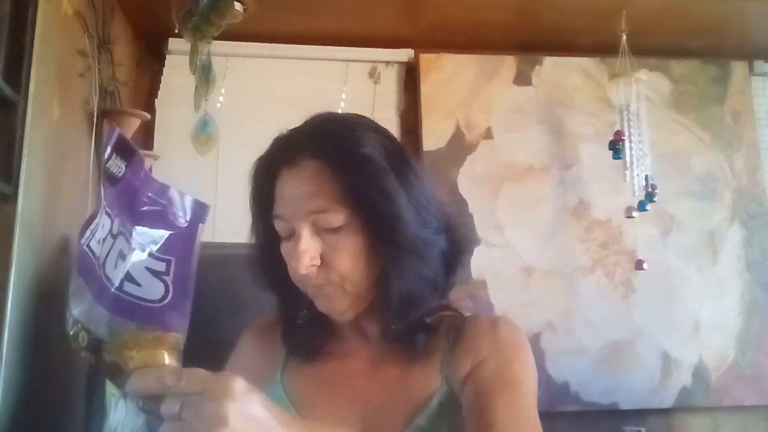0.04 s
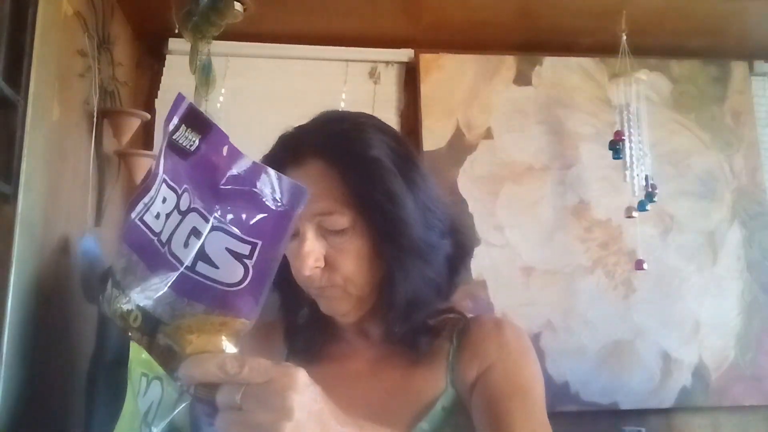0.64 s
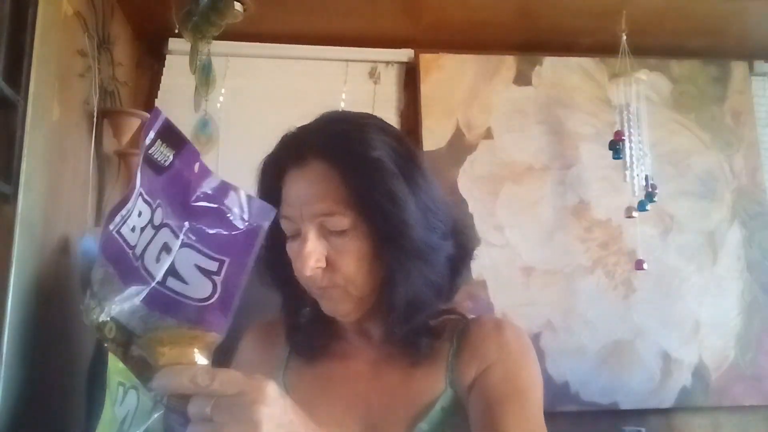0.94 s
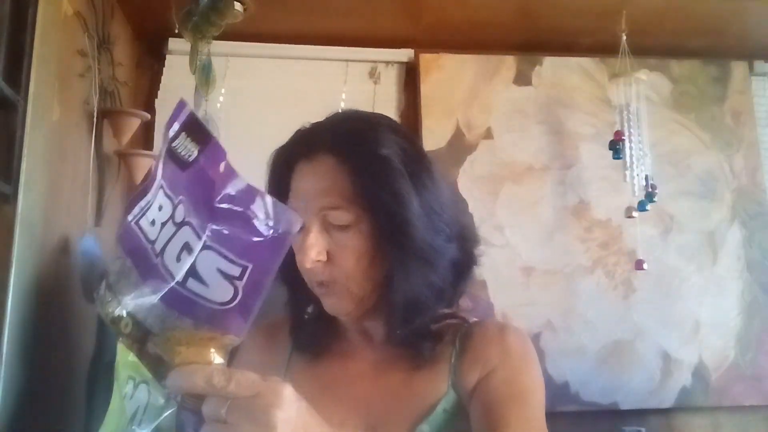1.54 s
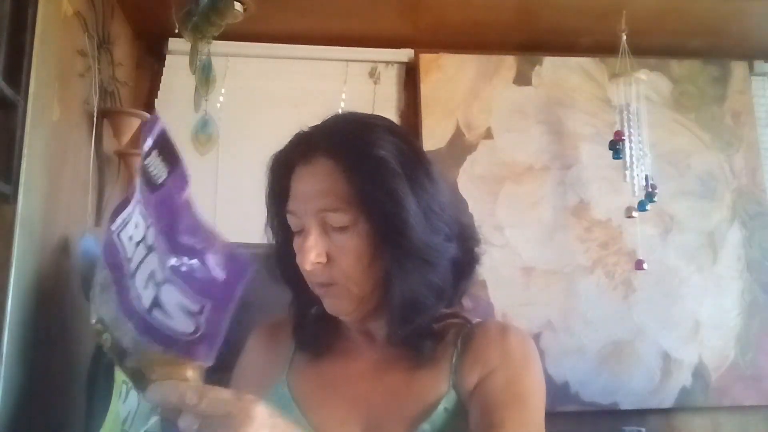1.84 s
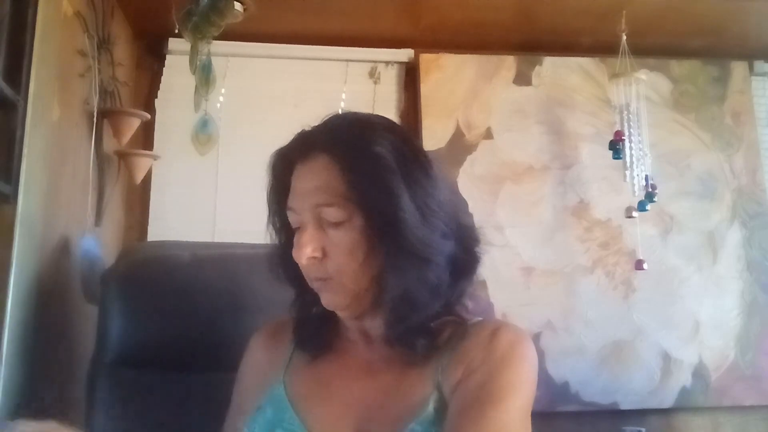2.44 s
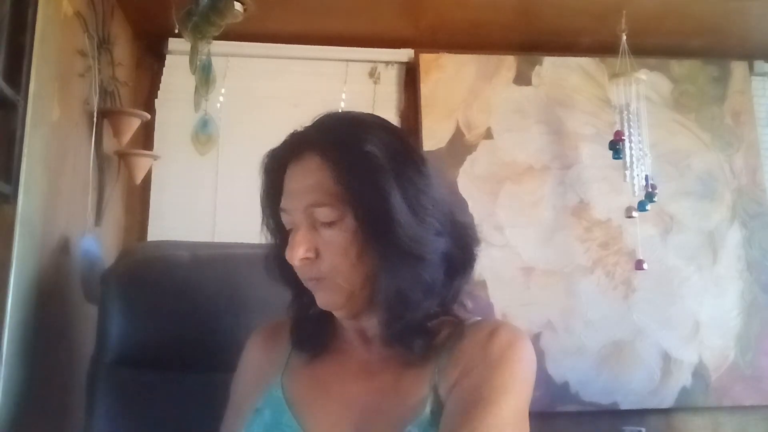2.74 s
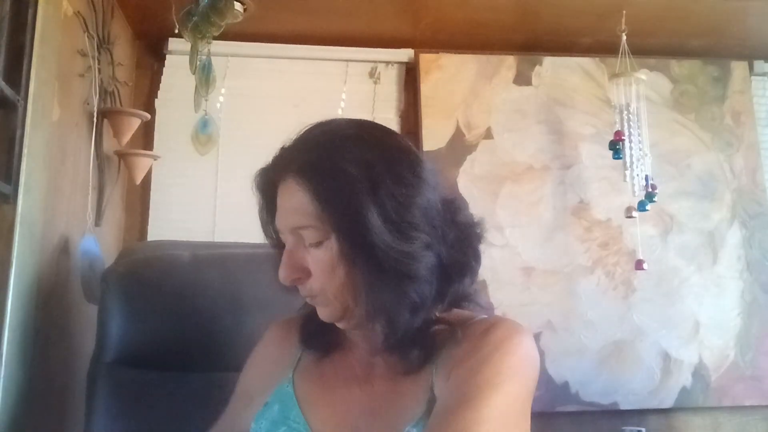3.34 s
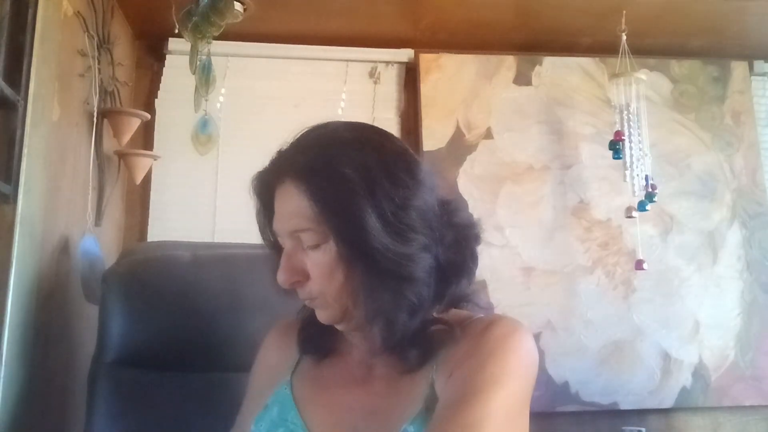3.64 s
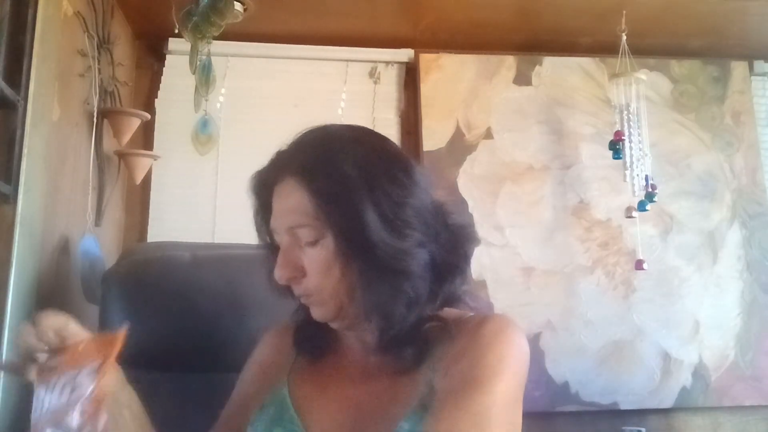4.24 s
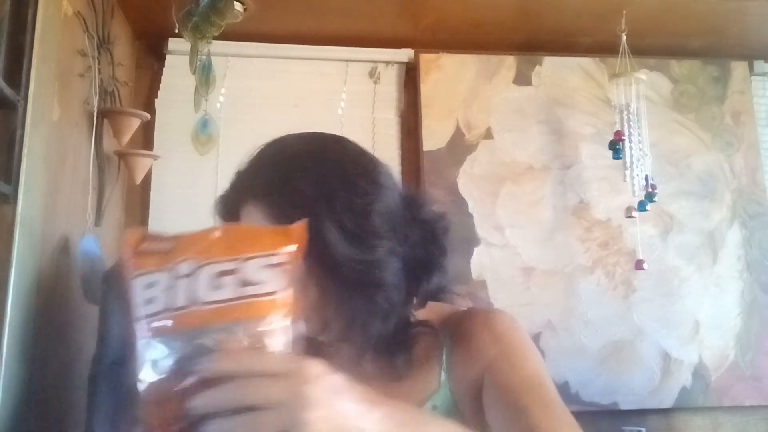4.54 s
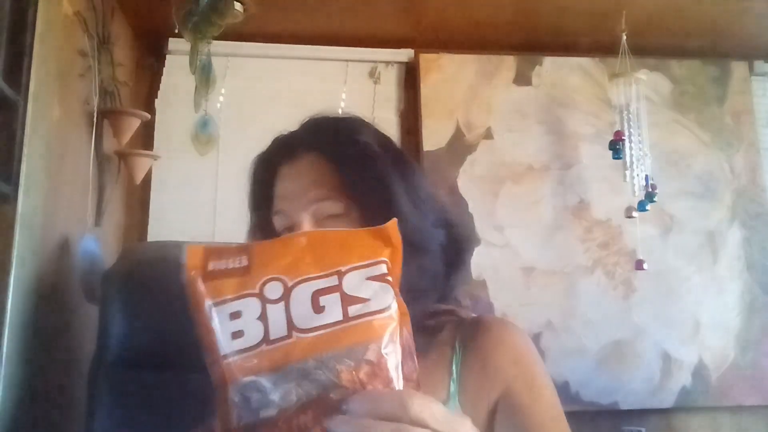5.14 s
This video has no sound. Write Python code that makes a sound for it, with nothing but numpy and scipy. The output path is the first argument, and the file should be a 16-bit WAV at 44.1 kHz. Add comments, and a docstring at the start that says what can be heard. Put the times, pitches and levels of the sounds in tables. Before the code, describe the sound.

Light crinkles and the hiss of fingers rubbing a plastic pouch come from nearby, slightly to the left. About halfway through, the rustling swells into dense crackling and sharp clicks as pouches are shuffled together, with a few soft hollow bumps. The bursts thin out, nearly stop, and return briefly as another pouch is held up. The small room adds short echoes over faint air and a low hum.

```python
"""Plastic snack pouches are handled in a small room, about an arm's length from a two-port microphone.
First a few folds snap; then fingers slide over one pouch, and stick-slip friction makes the film hiss.
Near 2.5 s it is pushed in among others: creases buckle in showers of clicks and the panels flap.
Then another is pulled out and held up, with soft hollow bumps, a lull, and last snaps near 5 s.
Throughout, the walls return short echoes over faint room air and a low hum."""
import sys
import numpy as np
from scipy import signal
from scipy.fft import rfft, irfft
from scipy.io import wavfile
from scipy.ndimage import uniform_filter1d

SR = 44100
rng = np.random.default_rng(int(sys.argv[2]) if len(sys.argv) > 2 else 0)


def generate_wav(sig):
    """Save sig (samples, or channels by samples) to the path in sys.argv[1] as 16-bit PCM at SR."""
    pcm = np.round(np.clip(np.atleast_2d(sig).T, -1, 1) * 32767).astype(np.int16)
    wavfile.write(sys.argv[1], SR, pcm)


N = 229052
TIME = np.arange(N) / SR

# fingers or another pouch slide over the film: (start [s], length [s], first level [dB], last level [dB])
STROKES = [(0.008, 0.025, -48, -52), (0.06, 0.1, -45, -46.5), (0.163, 0.28, -38.5, -48),
           (0.45, 0.24, -50, -57.5), (0.632, 0.047, -48, -50.5), (0.727, 0.02, -54, -60),
           (0.81, 0.12, -68.5, -75), (0.936, 0.049, -55.5, -50.5), (1.01, 0.064, -45.5, -39.5),
           (1.098, 0.1, -43, -36.5), (1.222, 0.15, -47.5, -48), (1.349, 0.067, -46.5, -47),
           (1.432, 0.26, -50, -59.5), (1.705, 0.26, -45, -52), (1.968, 0.15, -52, -49),
           (2.11, 0.13, -49.5, -40), (2.218, 0.096, -39.5, -34.5), (2.324, 0.26, -36.5, -37),
           (2.56, 0.26, -39.5, -35.5), (2.814, 0.044, -34, -35), (2.904, 0.12, -47.5, -39),
           (2.991, 0.14, -44, -43.5), (3.153, 0.16, -50.5, -50), (3.366, 0.19, -40.5, -39.5),
           (3.606, 0.13, -46, -57), (3.778, 0.017, -41, -43), (3.828, 0.02, -26, -37),
           (3.906, 0.29, -45.5, -55), (4.157, 0.16, -45.5, -52), (4.416, 0.27, -66, -74),
           (4.815, 0.14, -64, -63), (4.935, 0.03, -47, -45), (4.995, 0.13, -54, -46)]
# a hand grips, pushes or lifts a pouch: (start [s], length [s], first level [dB], last level [dB],
# small over large creases [dB], flapping over large creases [dB])
SQUEEZES = [(0.041, 0.017, -48.5, -48.5, -1, -12.5), (0.072, 0.023, -39.5, -46.5, 0.5, -11),
            (0.095, 0.019, -39.5, -39, -8, -12), (0.946, 0.026, -71, -59.5, 5.5, -23),
            (2, 0.026, -53.5, -62, -4, -7.5), (2.098, 0.39, -54.5, -48.5, -3.5, -14),
            (2.559, 0.024, -36, -35, 1.5, -15), (2.593, 0.115, -41, -40, 3.5, -11),
            (2.722, 0.11, -36.5, -36.5, 2, -11), (2.868, 0.013, -47, -46.5, 9.5, -13),
            (2.94, 0.026, -44, -45, -3.5, -10), (2.997, 0.021, -41, -37, 1, -12.5),
            (3.053, 0.05, -59, -53.5, 0, -18), (3.364, 0.022, -48, -42.5, 4.5, -13),
            (3.403, 0.019, -37.5, -38.5, 5.5, -13), (3.43, 0.14, -41.5, -40, -2.5, -11),
            (3.647, 0.061, -51.5, -47.5, 0, -14.5), (3.738, 0.05, -46, -48.5, 4.5, -13),
            (3.823, 0.031, -38.5, -40.5, 2, -15), (3.894, 0.04, -58, -47, -4, -19),
            (3.93, 0.12, -42, -45.5, 1, -12), (4.09, 0.071, -46.5, -48, 0, -20),
            (4.158, 0.052, -43.5, -40.5, 4, -14.5), (4.261, 0.051, -42.5, -40.5, -1.5, -15),
            (4.335, 0.11, -49, -63.5, -14, -21), (4.494, 0.2, -64, -78, 2.5, -26),
            (4.806, 0.036, -60, -66, 0.5, -9), (4.876, 0.075, -50, -49.5, -5.5, -15),
            (4.96, 0.15, -43, -43, 2, -12.5)]
# folds that snap through: (time [s], relative level [dB], facet frequency [Hz], edge over facet [dB])
SNAPS = [(0.048, -32.5, 7050, -7), (0.072, -28, 5100, -7), (0.111, -24, 5060, -16),
         (0.124, -30.5, 2500, -11), (0.95, -52, 1390, -1), (1.52, -36.5, 7330, 3), (2.565, -23.5, 3090, -3),
         (2.606, -22.5, 5400, -6), (2.69, -22, 3780, 14), (2.721, -25, 1510, -10),
         (2.736, -21.5, 3040, -18), (2.781, -23, 1560, -8), (2.8, -22, 4980, 3), (2.822, -14.5, 1950, 5.5),
         (2.835, -19.5, 5440, 0), (2.88, -28.5, 1410, -6), (2.937, -32.5, 1790, -8),
         (3.018, -19.5, 4900, -5.5), (3.284, -22, 4730, -6), (3.367, -24.5, 6100, 1.5),
         (3.406, -24, 1210, -14), (3.417, -23.5, 3600, -5), (3.467, -23, 5530, -15), (3.503, -24, 3360, -9),
         (3.752, -34, 3930, -10), (3.786, -28, 1980, -10), (3.829, -28, 1920, 4), (4.102, -43, 1400, -15),
         (4.181, -30, 2080, 25), (4.307, -31, 2860, -11), (4.482, -38, 1900, -30),
         (4.492, -37.5, 1490, -24), (4.602, -53, 837, -2), (4.812, -55, 1430, -3), (4.882, -35, 1400, -18),
         (4.968, -32.5, 2540, -12), (5.002, -30, 1410, -18), (5.033, -31, 1790, -4),
         (5.092, -27.5, 1990, -7), (5.127, -23.5, 1890, -16)]
# spectral shaping of sliding, crumpling and flapping film: (frequency [Hz], gain [dB])
SLIDE_SPECTRUM = [(300, -13), (1000, -26.5), (2000, -12), (3300, -5.5), (5000, -2), (7500, -1.5),
                  (9800, -4), (12500, 3), (16000, 1.5)]
CRUMPLE_SPECTRUM = [(200, -19.5), (500, -12), (850, -4.5), (1400, 1), (2200, -3.5), (3500, -0.5),
                    (5200, -3), (7000, -9), (9500, -15.5), (16000, -31.5)]
FLAP_SPECTRUM = [(30, -45), (70, -6.5), (110, -9), (150, -21.5), (200, -8), (340, -1.5), (600, -1),
                 (900, -4.5), (2000, -40.5), (8000, -79)]
# resonance of a stretched pouch face when rubbed: (frequency [Hz], width [Hz], gain [dB])
FACE_RESONANCE = [(1490, 200, 8)]
# soft bumps on a pouch: (time [s], relative level [dB])
BUMPS = [(.014, -54), (0.024, -48.5), (.045, -48), (.112, -39), (2.463, -52), (2.882, -39), (3.558, -43),
         (4.029, -42)]
# modes of the air-filled pouch: (frequency [Hz], relative level [dB], 60 dB decay time [s])
POUCH_MODES = [(375, 12, 0.1), (462, 14, 0.066), (505, 1, 0.11)]
# where the pouch is held: (time [s], left over right port in the bass and middle [dB])
POUCH_BALANCE = [(0.1, 2), (0.5, 6), (2.0, 7.5), (2.6, 0.5), (3.3, 2), (4.3, 2), (5.1, 3)]
# band-pass filters for the echoes, bass to treble: (lower edge [Hz], upper edge [Hz])
ECHO_BANDS = [signal.butter(3, edges, "band", fs=SR, output="sos")
              for edges in ((40, 650), (650, 1600), (1600, 7000), (7000, 19000))]
# wall echoes in those bands: (60 dB decay time [s], port difference over common part [ratio])
WALL_ECHOES = [(0.25, 0.37), (0.16, 0.97), (0.19, 0.93), (0.16, 1)]
# resonances of the furnished corner: (frequency [Hz], width [Hz], gain [dB])
CORNER_RESONANCES = [(205, 40, 3), (360, 50, 4), (510, 50, 2.5), (590, 60, -2), (750, 110, 3.5),
                     (990, 110, 2.5), (1130, 70, -4), (1260, 70, 2), (1420, 130, 2.5), (1570, 50, 2),
                     (2040, 170, 3), (2730, 80, 2), (3290, 70, 2)]
# spectrum of the quiet room: (frequency [Hz], relative level [dB])
ROOM_TONE = [(22, -47), (38, -17), (55, 0.5), (80, -22), (105, -1.5), (160, -15.5), (350, -9), (700, -17),
             (1300, -21), (3000, -29), (6000, -26.5), (9500, -27), (13000, -28.5), (16000, -26.5)]
# unequal response of the microphone's ports: (frequency [Hz], left over right [dB])
PORT_DIFFERENCE = [(60, 6.5), (150, 6), (350, 1), (800, 0), (2200, 1.3), (3300, 3.3), (4500, 1.3),
                   (7200, -1), (8200, 6), (9800, 2), (12500, 2.5), (16000, 1)]


def snaps(chatter=0.36, chatter_s=0.0019, echo_db=1, edge_hz=12500, ring_db=-4, ring_below_hz=2300):
    """Snap-through: a fold jumps to a new shape, its neighbours chatter, and the facet rings."""
    out = np.zeros((2, N))
    for start, db, hz, edge_db in SNAPS:
        echoes = wall_echoes()
        jolt = chatter * rng.standard_normal(echoes.shape) * np.exp(-TIME[:echoes.shape[1]] / chatter_s)
        jolt[:, 0] = 1
        drive = jolt / np.linalg.norm(jolt, axis=1, keepdims=True) + undb(echo_db) * echoes
        ring_gain = undb(ring_db) / (1 + (hz / ring_below_hz) ** 4)  # only large facets ring on
        facet = unit_rms(resonate(drive, hz, q=0.8)) + ring_gain * unit_rms(resonate(drive, hz, q=16))
        edge = unit_rms(resonate(resonate(drive, edge_hz, q=1.9), edge_hz, q=1))
        click = facet + undb(edge_db) * edge
        add(out, start, undb(db) * click / np.abs(click).max(axis=1).mean())
    # a small facet radiates little bass
    return colour(out, [(200, -24), (800, -6), (1300, 2), (7000, 4), (9800, 3.5), (12500, -2)])


def crumpling(large_gain, small_gain, split_hz=2600, ring_db=-9):
    """Buckling: large creases sound low, small ones high, and taut facets ring on at random pitches."""
    buckles = grains(per_s=1400, spread_db=4.5, low_hz=563, high_hz=10900, cycles=0.97, samples=192)
    buckles = steady(colour(buckles, CRUMPLE_SPECTRUM), span_s=0.021)
    large = signal.sosfiltfilt(signal.butter(2, split_hz, fs=SR, output="sos"), buckles)
    small = buckles - large
    taut = grains(per_s=240, spread_db=3.5, low_hz=1247, high_hz=2634, cycles=8.6, samples=1400)
    return large_gain * (large + undb(ring_db) * steady(taut, span_s=0.096)) + small_gain * small


def sliding():
    """Stick-slip friction: film catches on skin and film thousands of times a second, and hisses."""
    slips = grains(per_s=8000, spread_db=2.5, low_hz=1000, high_hz=15340, cycles=0.95, samples=48)
    return steady(colour(slips, SLIDE_SPECTRUM, FACE_RESONANCE), span_s=0.023)


def flapping():
    """Panel buckling: whole faces of the pouch flip over with dull pops."""
    pops = grains(per_s=600, spread_db=2.5, low_hz=133.6, high_hz=1370, cycles=0.74, samples=800, spots=3)
    return steady(colour(pops, FLAP_SPECTRUM), span_s=0.0213)


def bumps():
    """Damped normal modes: the air-filled pouch answers a soft bump with a short hollow ring."""
    out, t = np.zeros(N), TIME[:SR // 4]
    ring = sum(undb(db - 60 * t / t60) * np.sin(2 * np.pi * hz * t) for hz, db, t60 in POUCH_MODES)
    for start, db in BUMPS:
        add(out, start, undb(db) * ring / np.abs(ring).max())
    return out


def handling(dent_db=-15.5, small_dent_db=-9.5, stir_db=-28.5):
    """Incoherent powers add: all movements sum to gains for sliding, large and small creases, flapping."""
    slide = sum(movement(*stroke, attack_s=0.022, release_db_per_s=466) for stroke in STROKES)
    # a sliding finger also dents the film and stirs the panels
    large, small, flap = (slide * undb(db) ** 2 for db in (dent_db, small_dent_db, stir_db))
    for *squeeze, small_db, flap_db in SQUEEZES:
        power = movement(*squeeze, attack_s=0.0058, release_db_per_s=308)
        large += power
        small += power * undb(small_db) ** 2
        flap += power * undb(flap_db) ** 2
    return np.sqrt([slide, large, small, flap])


def movement(start, length, first_db, last_db, attack_s, release_db_per_s):
    """Drive and relaxation: a movement's power sets in, swells or eases, then decays exponentially."""
    age = TIME - start
    db = np.interp(age, [0, length], [first_db, last_db]) - release_db_per_s * np.clip(age - length, 0, 1)
    return np.clip(age / attack_s, 0, 1) * 10 ** (db / 10)


def grains(per_s, spread_db, low_hz, high_hz, cycles, samples, spots=8):
    """Shot noise: facets ring at random times and spots, each falling to 1/e in the given cycles."""
    when, rank, pitch, phase, spot = rng.random((int(per_s * N / SR), 5)).T
    hz = low_hz * (high_hz / low_hz) ** pitch
    gain = undb(-spread_db * np.log(rank + .02)) * hz / low_hz  # most are weak, a few strong
    age_cycles = hz[:, None] * np.arange(samples) / SR
    rings = gain[:, None] * np.exp(-age_cycles / cycles) * np.sin(2 * np.pi * (age_cycles + phase[:, None]))
    starts = (spot * spots).astype(int) * N + (when * (N - samples)).astype(int)
    places = starts[:, None] + np.arange(samples)
    return np.bincount(places.ravel(), rings.ravel(), spots * N).reshape(spots, N)


def steady(spots, span_s):
    """Steady energy input from the hand: all spots together have unit power over a short span."""
    power = uniform_filter1d(np.sum(spots ** 2, axis=0), int(span_s * SR))
    return spots / np.sqrt(power + 1e-9)


def resonate(x, hz, q):
    """Second-order resonance, with a gain of one at its centre."""
    w = 2 * np.pi * hz / SR
    damping = np.sin(w) / (2 * q)
    return signal.lfilter([damping, 0, -damping], [1 + damping, -2 * np.cos(w), 1 - damping], x)


def colour(x, points, peaks=(), size=4096):
    """Minimum-phase filtering by a gain curve and resonance peaks."""
    f = np.linspace(0, SR / 2, size + 1)
    hz, db = np.transpose(points)
    curve_db = np.interp(np.log(f + 1), np.log(hz), db)
    for centre, width, gain in peaks:
        curve_db += gain / (1 + (2 * (f - centre) / width) ** 2)
    cepstrum = irfft(np.log(undb(curve_db)))[:size]
    cepstrum[1:] *= 2  # folding onto positive time makes the filter causal
    response = irfft(np.exp(rfft(cepstrum, 2 * size)))[:size]
    return signal.oaconvolve(np.atleast_2d(x), response[None], axes=1)[:, :N].reshape(x.shape)


def add(track, start_s, sound):
    """Superposition: a sound adds to the track from its start time."""
    i = int(start_s * SR)
    track[..., i:i + sound.shape[-1]] += sound[..., :N - i]


def undb(db):
    """Decibel law: 20 dB is a tenfold amplitude."""
    return 10 ** (np.asarray(db) / 20)


def unit_rms(x):
    """Normalisation to a mean power of one."""
    return x / np.sqrt(np.mean(x ** 2))


def held_aside(x, below_hz=3200):
    """Level difference: a pouch held to one side is louder at that port, mostly below the treble."""
    body = signal.sosfiltfilt(signal.butter(1, below_hz, fs=SR, output="sos"), x)
    left_db = np.interp(TIME, *np.transpose(POUCH_BALANCE))
    return x - body + body * undb(np.array([left_db, -left_db]) / 2)


def room(spots, direct_db, echo_db, max_lag_s):
    """Multipath propagation: each spot has its own echoes and its own small lag at the left port."""
    out = 0
    for x in spots:
        response = undb(echo_db) * wall_echoes()
        response[0, int(rng.random() * max_lag_s * SR)] += undb(direct_db)
        response[1, 0] += undb(direct_db)
        out = out + signal.oaconvolve(x[None], response, axes=1)[:, :N]
    return out


def wall_echoes(gap_s=.002):
    """Diffuse reverberation: dense echoes die away; long waves reach both ports nearly alike."""
    t, tail = TIME[:SR // 5], 0
    for band, (t60, apart) in zip(ECHO_BANDS, WALL_ECHOES):
        mid, side = signal.sosfilt(band, rng.standard_normal((2, len(t))))
        ports = np.array([mid + apart * side, mid - apart * side]) / np.hypot(1, apart)
        tail = tail + ports * undb(-60 * t / t60)
    tail = tail * (t > gap_s)
    return tail / np.sqrt(np.sum(tail ** 2, axis=1, keepdims=True))


def background(air_db, hum_db, apart_db=-4, hum_hz=57, waver=0.59):
    """Ambient noise: faint room air, and a low hum that wavers as a tone beats with narrow-band noise."""
    air = rng.standard_normal(N) + undb(apart_db) * rng.standard_normal((2, N))
    sway = unit_rms(resonate(rng.standard_normal(N), hum_hz, q=9.9))
    hum = unit_rms(np.sin(2 * np.pi * hum_hz * TIME) + waver * sway)
    return undb(air_db) * unit_rms(colour(air, ROOM_TONE)) + undb(hum_db) * hum


def scene():
    """Superposition: the pouch sounds add, coloured by the room's corner, over the background."""
    slide, large, small, flap = handling()
    film = slide * sliding() + crumpling(large, small)
    rustle = room(film, direct_db=-3.5, echo_db=-2, max_lag_s=0.0002)
    panels = room(flap * flapping(), direct_db=-1, echo_db=-5, max_lag_s=0.0004)
    knocks = room([bumps()], direct_db=-1.5, echo_db=-9, max_lag_s=0.00013)
    pouches = held_aside(rustle + snaps() + panels + knocks)
    in_corner = colour(pouches, [(100, -1.9), (16000, -0.9)], CORNER_RESONANCES)
    return in_corner + background(air_db=-70, hum_db=-78.5)


def record(dry):
    """Frequency response: each port has its own colour, and a steep low-pass cuts above 16 kHz."""
    ports = np.array([colour(x, [(hz, side * db / 2) for hz, db in PORT_DIFFERENCE])
                      for x, side in zip(dry, (1, -1))])
    return signal.sosfilt(signal.ellip(12, .2, 80, 16000, fs=SR, output="sos"), ports)


dry = scene()
out = record(dry)
generate_wav(out)
```